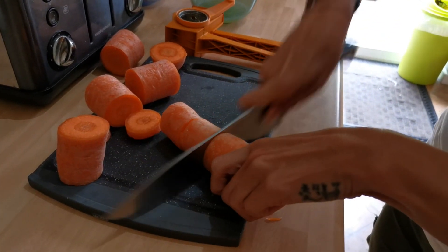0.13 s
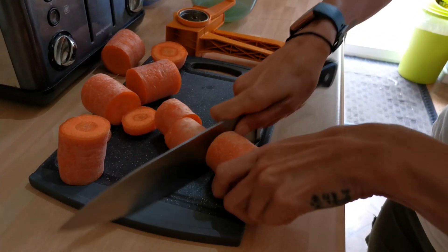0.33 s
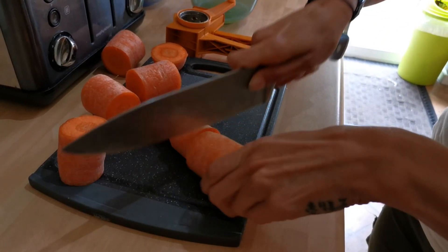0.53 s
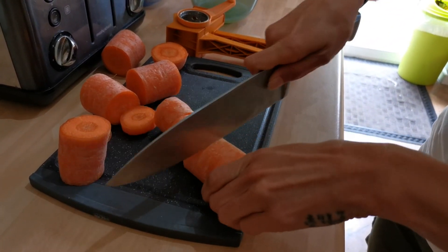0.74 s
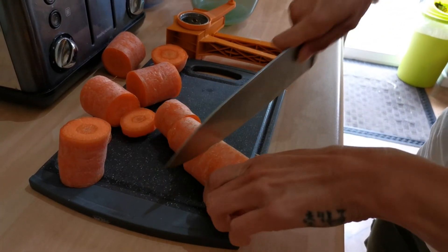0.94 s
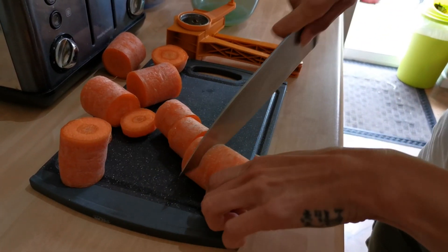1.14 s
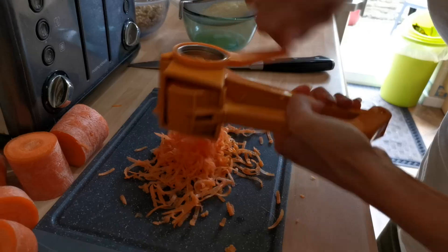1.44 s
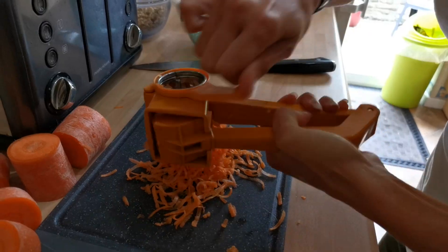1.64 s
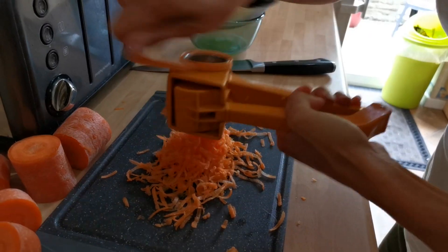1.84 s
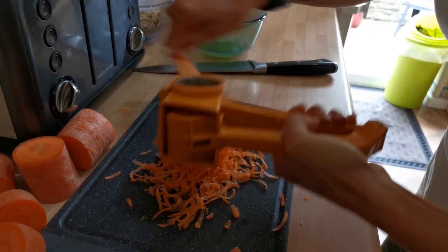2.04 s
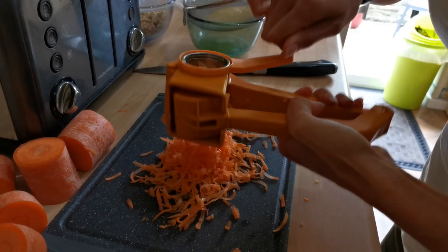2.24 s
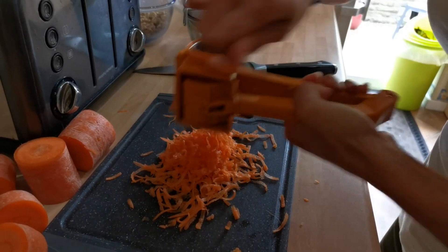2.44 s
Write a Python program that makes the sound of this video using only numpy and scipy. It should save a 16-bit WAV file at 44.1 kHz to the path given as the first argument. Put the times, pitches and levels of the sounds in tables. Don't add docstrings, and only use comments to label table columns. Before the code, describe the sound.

Carrot chopping with hard board knocks, a short silence, then bursts of rotary grater scraping

```python
import sys
import numpy as np
from scipy import signal
from scipy.fft import rfft, irfft
from scipy.io import wavfile
from scipy.ndimage import uniform_filter1d

SR = 44100
rng = np.random.default_rng(int(sys.argv[2]) if len(sys.argv) > 2 else 0)


def store_pcm(level_fs):
    pcm = np.round(np.clip(level_fs, -1, 1) * 32767).astype(np.int16)
    wavfile.write(sys.argv[1], SR, np.atleast_2d(pcm).T)


def gain_from_decibels(decibels):
    exponent = np.asarray(decibels, float) / 20
    return 10 ** exponent


N = 114660


def evened(x):
    return x / np.sqrt(np.mean(x ** 2) + 1e-20)


def read(points, hz):
    f, value = np.transpose(points)
    return np.interp(np.log(hz + 1), np.log(f + 1), value)


def follow(curve):
    s, value = np.transpose(curve)
    return np.interp(np.arange(N) / SR, s, value)


def colour(x, points):
    return irfft(rfft(x) * gain_from_decibels(read(points, np.fft.rfftfreq(N, 1 / SR))), N)


def resonate(x, hz, width_hz):
    r = np.exp(-np.pi * width_hz / SR)
    b = [(1 - r * r) / 2, 0, (r * r - 1) / 2]
    a = [1, -2 * r * np.cos(2 * np.pi * hz / SR), r * r]
    return signal.lfilter(b, a, x)


def clicks(per_s, spread_db):
    happens = rng.random(N) < per_s / SR
    size = gain_from_decibels(spread_db * np.minimum(rng.exponential(1, N), 4))
    sign = rng.choice([-1., 1.], N)
    return evened(sign * happens * size)


def tail(decay, size):
    hz, t, z = signal.stft(rng.standard_normal(size), SR, nperseg=256)
    t60_s = read(decay, hz)[:, None]
    out = signal.istft(z * gain_from_decibels(-60 * t / t60_s), SR, nperseg=256)[1]
    return out / np.linalg.norm(out)


# (frequency [Hz], level [dB])
ROOM_TONE = [(15, -41.5), (25, 6.5), (119, 3.5), (204, -9.5), (469, -9), (997, -18.5), (2120, -21.5),
             (7700, -29.5), (15500, -61.5)]
TONE_DB = -68.5


def room_tone():
    a, b = rng.standard_normal((2, N))
    side = colour(b, [(60, -12.5), (1000, -3), (4000, 1.2)])
    left, right = colour(a + side, ROOM_TONE), colour(a - side, ROOM_TONE)
    return gain_from_decibels(TONE_DB) * evened(np.array([left, right]))


# (frequency [Hz], t60 [s])
KITCHEN = [(100, 0.23), (500, 0.17), (2000, 0.23), (6000, 0.33), (12000, 0.89)]


def kitchen(x):
    a, b = tail(KITCHEN, size=SR // 2), tail(KITCHEN, size=SR // 2)
    late = np.pad(x, (200, 0))[None, :N]
    return signal.fftconvolve(late, np.array([a + .5 * b, b + .5 * a]), axes=1)[:, :N]


# (frequency [Hz], share [0-1])
LIKENESS = [(100, 0.96), (700, 1), (2000, 0.61), (5000, 0.2), (12000, 0.5)]


def ports(x, other, balance, lead_s):
    hz = np.fft.rfftfreq(N, 1 / SR)
    same = np.clip(read(LIKENESS, hz), 0, 1)
    left = gain_from_decibels(read(balance, hz) / 2)
    right = np.exp(-2j * np.pi * hz * lead_s) / left
    norm = 2 / np.sqrt(left ** 2 + abs(right) ** 2 + 2 * same * left * right.real)
    a, b = rfft(x), rfft(other)
    mixed = same * a + np.sqrt(1 - same ** 2) * b
    return irfft(norm * np.array([left * a, right * mixed]), N)


# (time [s], level [dB])
CRANK = [(1.768, -41), (1.79, -38.5), (1.82, -32), (1.87, -46), (1.915, -65), (1.928, -42), (1.955, -36.5),
         (2.015, -38), (2.05, -59.5), (2.09, -38.5), (2.2, -35), (2.235, -44), (2.305, -31.5), (2.36, -41),
         (2.439, -72), (2.444, -42), (2.51, -32), (2.57, -42), (2.6, -51.5)]
# (frequency [Hz], width [Hz], level [dB])
DRUM = [(790, 200, -17), (1510, 350, -13), (2030, 200, -6), (2640, 170, -.5), (3200, 200, 0),
        (3550, 220, -7), (4900, 500, -14), (5500, 500, -14), (7800, 1000, -12)]
# (frequency [Hz], level [dB])
SHRED = [(180, -33), (300, -6.5), (417, -32), (794, -23), (1000, -17.5), (3230, -0.5), (4140, -3.5),
         (7880, -3), (15500, -10.5)]
# (time [s], level [dB])
SNAGS = [
    (1.811, -4),
    (1.822, -41),
    (1.955, -12),
    (2.2, -28.5),
    (2.312, -26),
    (2.444, -20),
    (2.447, -12.5),
    (2.497, -28.5),
    (2.509, -14.5),
]
TEETH_PER_S, TOOTH_SPREAD_DB, TOOTH_DETUNE, SHRED_DB = 500, 3.2, .05, -7


def grater():
    def ring(x, hz, width_hz):
        return resonate(resonate(x, hz, width_hz), hz, 2 * width_hz)

    bites = np.zeros(N)
    for hz, width_hz, db in DRUM:
        for side in (-1, 1):
            teeth = clicks(TEETH_PER_S, TOOTH_SPREAD_DB)
            bites += gain_from_decibels(db) * ring(teeth, hz * (1 + side * TOOTH_DETUNE), width_hz)
    shred = evened(colour(clicks(5500, 0.83) + rng.standard_normal(N), SHRED))
    snags = np.zeros(N)
    for s, db in SNAGS:
        snags[round(s * SR)] = gain_from_decibels(db + 11)
    caught = sum((-1) ** k * gain_from_decibels(db) * ring(snags, hz, width_hz)
                 for k, (hz, width_hz, db) in enumerate(DRUM))
    cranked = gain_from_decibels(follow(CRANK) - 1.5) * (evened(bites) + gain_from_decibels(SHRED_DB) * shred)
    return (cranked + caught) * (np.arange(N) > 1.5 * SR)


# (frequency [Hz], level [dB])
BOARD = [(132, -15), (264, 1.5), (365, -1), (595, 4), (745, -2.5), (865, -3), (1050, -10.5), (1220, 6.5),
         (1500, 1), (1870, 4.5), (2220, 7.5), (2600, 1.5), (3200, 2.5), (4700, 6.5)]
# (frequency [Hz], level [dB], width [Hz])
BLADE = [(5740, 0, 50), (7800, -14, 250)]
# (frequency [Hz], t60 [s])
RATTLE = [(100, 0.76), (600, .3), (2000, 0.34), (8000, 0.05)]
BOARD_Q, FALL_DB_PER_OCTAVE, SOFTNESS = 9, -2, 1.15
CRACK_DB, RATTLE_DB = -9.5, -9
CRUNCH_DB, CRUNCH_HZ = -17.5, 3500


def knock(db, contact_s, top_hz, blade_db):
    def unit(x):
        return x / np.sqrt(np.sum(x ** 2) / (contact_s * SR))

    t = np.arange(SR // 6) / SR
    hit = rng.standard_normal(len(t)) * np.exp(-(t / contact_s) ** 1.5) * np.minimum(t / 0.00023, 1)
    modes = np.zeros(len(t))
    for hz, mode_db in BOARD:
        gain_db = mode_db - FALL_DB_PER_OCTAVE * abs(np.log2(hz / top_hz))
        modes += gain_from_decibels(gain_db) * resonate(hit, hz, hz / BOARD_Q)
    board = unit(modes) + gain_from_decibels(CRACK_DB) * unit(resonate(hit, top_hz, 1.5 * top_hz))
    board = unit(signal.lfilter(*signal.butter(N=2, Wn=SOFTNESS * top_hz, fs=SR), board))
    crunch = gain_from_decibels(CRUNCH_DB + blade_db / 4) * unit(resonate(hit, CRUNCH_HZ, 3700))
    blade = sum(gain_from_decibels(d) * unit(resonate(hit * (t < .003), hz, width_hz)) for hz, d, width_hz in BLADE)
    sound = gain_from_decibels(RATTLE_DB) * signal.fftconvolve(board + crunch, tail(RATTLE, size=SR // 3))
    sound[:len(t)] += board + gain_from_decibels(blade_db) * blade
    return gain_from_decibels(db) * sound


# (time [s], strength [dB], contact [s], upper end of the board sound [Hz], blade ring [dB])
KNOCKS = [(.207, -25, 0.015, 1530, -30), (.281, -20.5, 0.0095, 1200, -37), (.289, -17, 0.0077, 991, -10.5),
          (.302, -27.5, 0.0092, 793, -28), (.294, -35.5, .05, 3400, -50.5),
          (.465, -37.5, 0.0081, 1200, -35), (.594, -58.5, 0.0056, 696, -37), (.6, -54, 0.044, 147, -60),
          (0.86, -61.5, 0.026, 100, -63), (1.341, -18, 0.0075, 1700, -29), (1.355, -25, 0.0052, 900, -39.5)]
TICK_S, TICK_DB, TICK_HZ, TICK_DECAY_S = .853, -44.5, (1450, 9300), .011


def chopping():
    out = np.zeros(N + SR)
    for s, *row in KNOCKS:
        sound = knock(*row)
        out[round(s * SR):][:len(sound)] += sound
    t = np.arange(SR // 8) / SR
    band = signal.butter(N=2, Wn=TICK_HZ, btype="band", fs=SR)
    tick = signal.lfilter(*band, rng.standard_normal(len(t))) * np.exp(-t / TICK_DECAY_S)
    out[round(TICK_S * SR):][:len(t)] += gain_from_decibels(TICK_DB) * tick
    return out[:N]


# (time [s], level [dB])
SLICE = [(0, -64), (.07, -75.5), (.1, -63.5), (.17, -45), (.204, -40), (.23, -61), (.252, -45), (.275, -54),
         (.4, -81), (.6, -78), (.65, -92), (.85, -93.5), (.856, -63), (1.0, -83), (1.03, -77.5), (1.2, -67),
         (1.267, -56.5), (1.272, -51.5), (1.36, -40.5)]
# (frequency [Hz], level [dB])
FIBRE = [(150, -23), (1000, -14), (2200, -5), (4500, -6.5), (5700, -2), (7200, -4), (9500, -11.5),
         (15500, -21)]
CRACKS_PER_S, CRACK_SPREAD_DB, SLICE_HISS_DB = 2500, 3, 5.5
SING_DB, SING_WIDTH_HZ = (-8, -6.5), 320
CREAK_HZ, CREAK_WIDTH_HZ, CREAK_DB, CREAK_FOLLOW = (385, 185.96), 240, -0.5, 0.91
PATCHY_DB = 2.5


def slicing():
    first_cut = np.arange(N) < .75 * SR
    fibres = clicks(CRACKS_PER_S, CRACK_SPREAD_DB) + gain_from_decibels(SLICE_HISS_DB) * rng.standard_normal(N)
    sing = sum(resonate(fibres, hz, SING_WIDTH_HZ) for hz, _, _ in BLADE)
    tear = evened(colour(fibres, FIBRE)) + gain_from_decibels(np.where(first_cut, *SING_DB)) * evened(sing)
    creaks = []
    for hz in CREAK_HZ:
        once = resonate(rng.standard_normal(N), hz, CREAK_WIDTH_HZ)
        creaks.append(gain_from_decibels(CREAK_DB) * evened(resonate(once, hz, CREAK_WIDTH_HZ)))
    creak = np.where(first_cut, *creaks)
    push_db = follow(SLICE) + PATCHY_DB * evened(uniform_filter1d(rng.standard_normal(N), size=900))
    return gain_from_decibels(push_db + 3.5) * tear + gain_from_decibels(CREAK_FOLLOW * (push_db + 34.5) - 45) * creak


# (frequency [Hz], left minus right [dB])
KNIFE_LR = [(60, -0.5), (180, 2), (550, 4.5), (1650, -1.5), (4970, -6.5), (15000, 9)]
GRATER_LR = [(60, -4), (180, -10.5), (550, 2.5), (1650, -10), (4970, -1), (15000, 21.5)]
KNIFE_LEAD_S, GRATER_LEAD_S = -0.000049, .00012
KNIFE_WET_DB, GRATER_WET_DB = -11, -12
OUT_S, DROP_DB, FADE_DB_PER_S, END_S, IN_S = 1.363, -15, -1200, 1.395, 1.768


def scene():
    knife, drum = slicing() + chopping(), grater()
    first = ports(knife, slicing() + chopping(), KNIFE_LR, KNIFE_LEAD_S)
    first = first + gain_from_decibels(KNIFE_WET_DB) * kitchen(knife)
    second = ports(drum, grater(), GRATER_LR, GRATER_LEAD_S) + gain_from_decibels(GRATER_WET_DB) * kitchen(drum)
    t, tone = np.arange(N) / SR, room_tone()
    fade = np.where(t < OUT_S, 1, gain_from_decibels(DROP_DB + FADE_DB_PER_S * (t - OUT_S))) * (t < END_S)
    rise = np.clip((t - IN_S) / 0.0027, 0, 1)
    return (first + tone) * fade + (second + gain_from_decibels(3) * tone) * rise


def roll_off(x):
    return signal.sosfilt(signal.butter(12, 15730, fs=SR, output="sos"), x)


# (frequency [Hz], level [dB])
MIC = [(20, -8), (60, 4.44), (6800, -1.4), (7800, 0), (8300, -5), (8700, -5.5), (15000, -10)]


def record(dry):
    response = gain_from_decibels(read(MIC, np.fft.rfftfreq(512, 1 / SR)))
    taps = np.fft.fftshift(irfft(response)) * np.hanning(512)
    heard = signal.oaconvolve(dry, taps[None], "same", axes=1) * (abs(dry) > 0)
    return roll_off(heard)


dry = scene()
out = record(dry)
store_pcm(out)
```